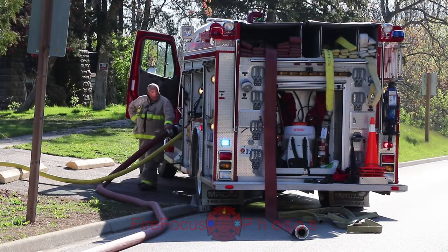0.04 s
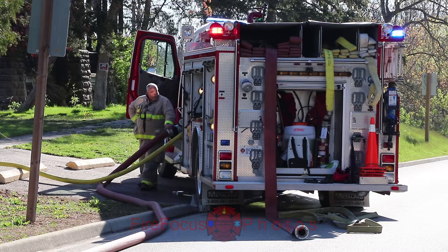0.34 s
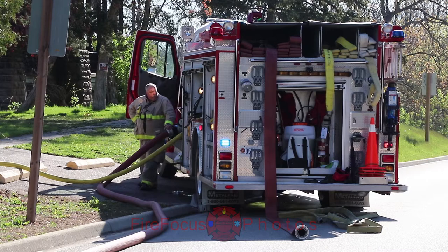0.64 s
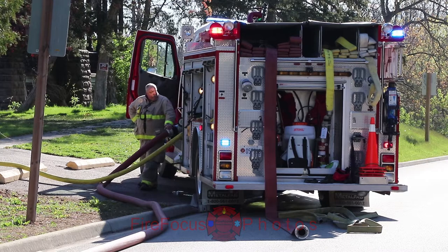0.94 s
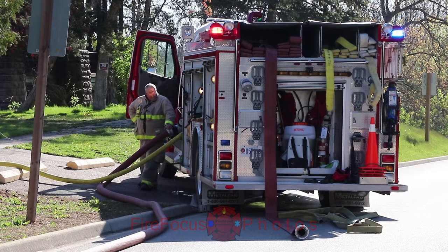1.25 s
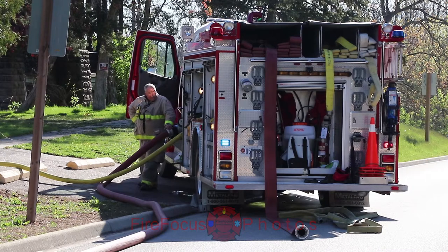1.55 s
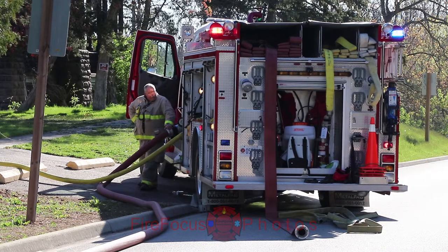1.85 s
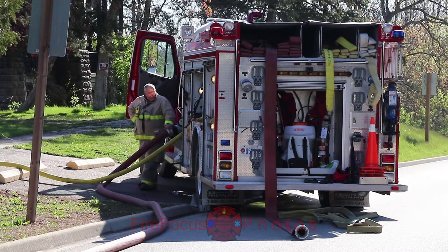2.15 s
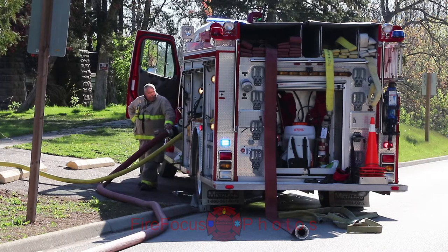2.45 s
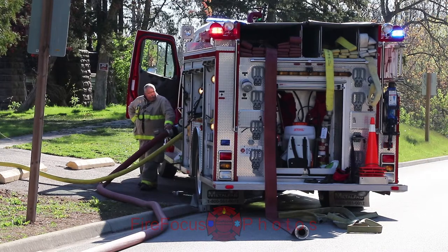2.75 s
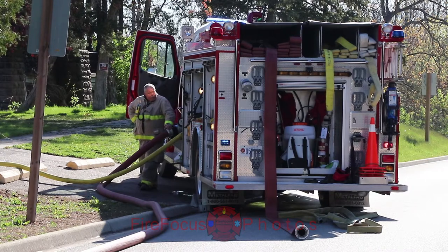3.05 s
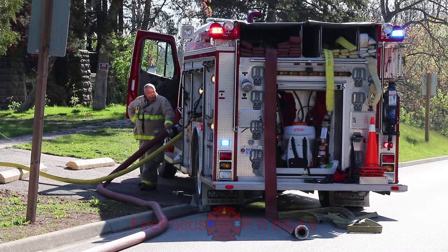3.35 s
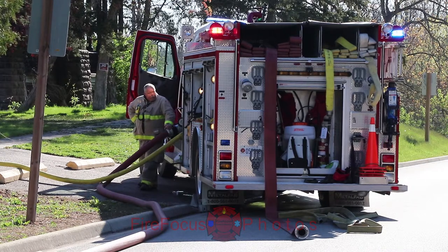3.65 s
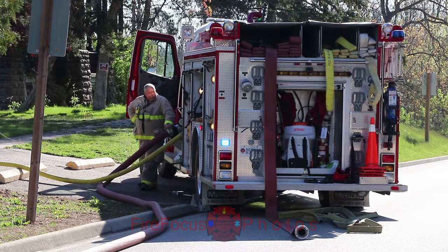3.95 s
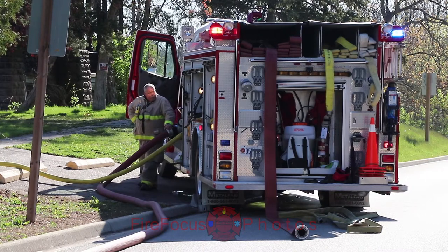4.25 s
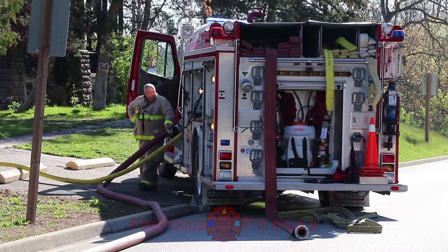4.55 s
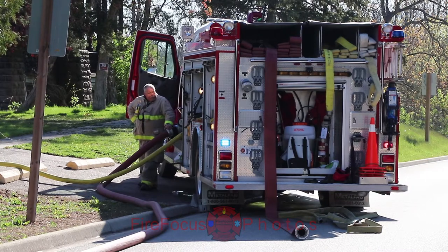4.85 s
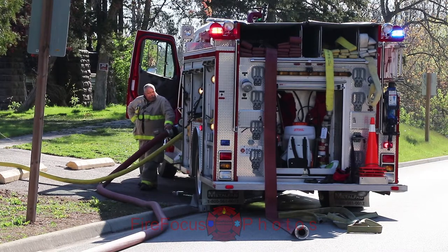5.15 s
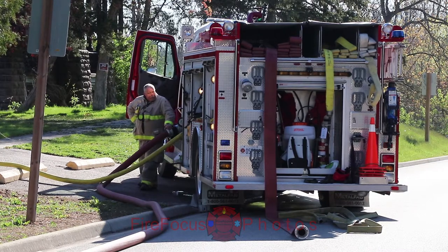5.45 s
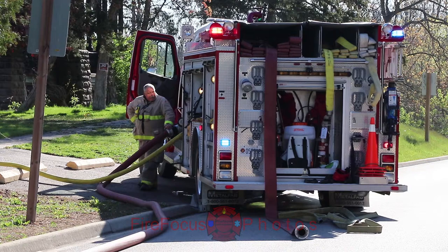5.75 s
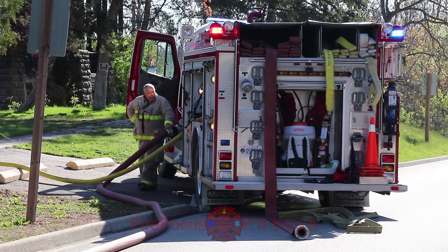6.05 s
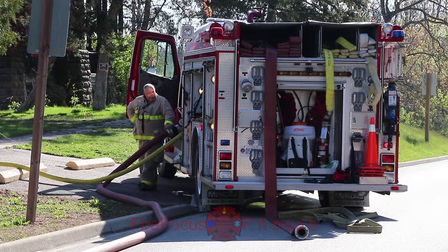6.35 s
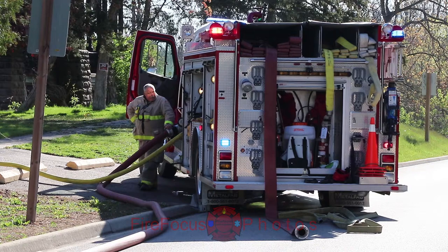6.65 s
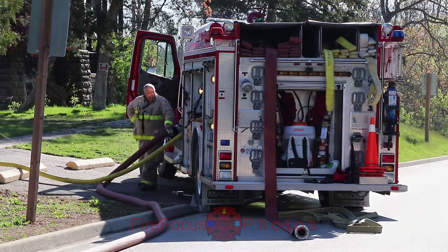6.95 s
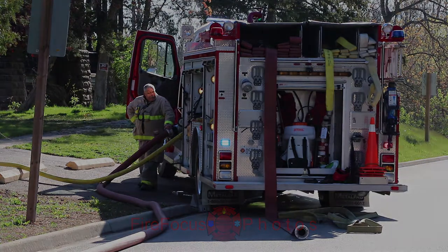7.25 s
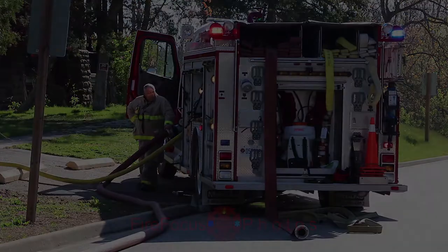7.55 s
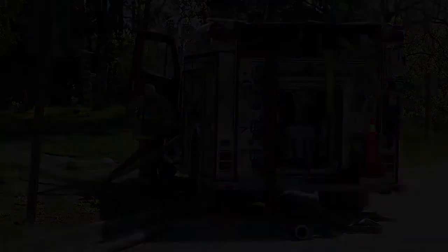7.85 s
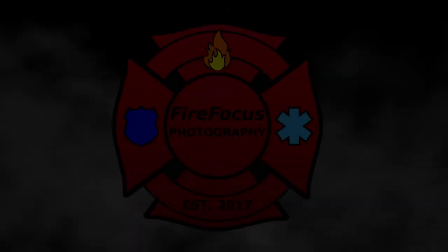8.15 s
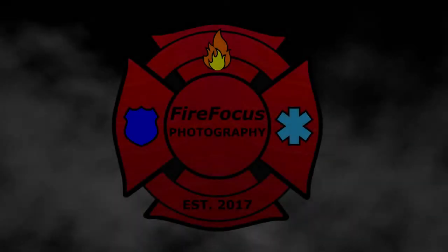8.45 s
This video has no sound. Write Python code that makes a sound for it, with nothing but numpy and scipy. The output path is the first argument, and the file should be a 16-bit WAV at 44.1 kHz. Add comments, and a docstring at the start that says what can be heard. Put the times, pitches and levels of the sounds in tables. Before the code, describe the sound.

A parked fire engine idles with a steady diesel drone, gear whine and rushing pump, while small birds chirp faintly.

```python
"""Fire engine idling, pump engaged

A six-cylinder diesel drones and clatters at the roadside, a 41-tooth gear whines on top, and the fan
and pump lay down a rushing bed. The crank speed sags around the first second and pulls the tones down
with it. A gust buffets the microphone, small birds chirp in the trees, and the sound fades out."""
import sys
import numpy as np
from scipy import signal
from scipy.fft import rfft, irfft, next_fast_len
from scipy.io import wavfile

SR = 44100
rng = np.random.default_rng(int(sys.argv[2]) if len(sys.argv) > 2 else 0)


def wav_out(sig):
    """Save sig, one row per channel (or a flat mono array), as 16-bit PCM at SR to the path in sys.argv[1]."""
    wavfile.write(sys.argv[1], SR, np.round(np.clip(np.atleast_2d(sig).T, -1, 1) * 32767).astype(np.int16))


N = 375291
TIME = np.arange(N) / SR

# long falling whistles deep in the trees: peak_s, top_hz, drop_hz, level_db
FAR_WHISTLES = [(6.635, 5600, 1100, -69.5), (7.06, 6300, 650, -74), (7.34, 5100, 600, -70)]
# short chirps of a nearby bird: peak_s, top_hz, drop_hz, level_db
NEAR_CHIRPS = [(0.950, 4130, 450, -54.5), (0.955, 4620, 330, -58.5), (1.163, 5020, 750, -59.5),
               (1.465, 4420, 1105, -54.5), (1.710, 4280, 1104, -56), (3.07, 4100, 600, -60),
               (5.325, 5000, 1800, -63), (6.05, 4900, 1800, -60.5), (6.315, 4350, 1104, -55)]
# the gust's strongest eddies thumping the microphone: peak_s, level_db, top_hz
WIND_THUMPS = [(0.817, -27.5, 170), (0.94, -25.5, 260), (1.128, -25, 140)]
# tone colour of the cooling fan and the water in the pump: frequency_hz, gain_db
RUSH_EQ = [(20, -17.5), (38, 1), (80, 5.5), (240, 3), (400, -3.5), (700, -3.5), (900, -8.5), (1250, -7),
           (2000, -12), (2750, -22.5), (3900, -30), (5000, -35), (6500, -46.5), (10000, -52.5)]
# ringing of the pump casing and pipework: pitch_hz, width_hz, level_db
CASING_RINGS = [(584, 15, -55), (1020, 120, -65), (2395, 140, -57), (3007, 70, -64.5), (4366, 87, -66)]
# crankshaft speed: time_s, speed_rpm
CRANK_SPEED = [(0.0, 933.6), (0.55, 932.5), (1.03, 903.4), (1.5, 892.3), (2.1, 888.2), (2.4, 888.2),
               (2.7, 893.8), (3.0, 894.0), (3.3, 890.8), (3.6, 891.3), (3.9, 888.0), (4.43, 893.8),
               (5.11, 890.9), (5.69, 894.6), (6.36, 894.0), (6.6, 891.0), (6.9, 893.0), (7.36, 890.0)]
# combustion knock of each cylinder, in firing order: accent_db
KNOCK_ACCENTS = [7, -3, 7, 6.5, 1, -2.5]
# tone colour of the block and valve gear: frequency_hz, gain_db
CLATTER_EQ = [(30, -14.5), (70, 3.5), (130, 3.5), (260, 7), (380, -2), (520, -6), (630, 1.5), (880, -8.5),
              (1080, 1), (1500, -11), (2400, -17.5), (2750, -18.5), (4350, -22.5), (4750, -38), (8000, -62)]
# exhaust and block tones: cycles_per_turn (played to the nearest half), low_idle_db, high_idle_db
ENGINE_TONES = [(3, -41.5, -39), (4.5, -40.5, -43.5), (6, -44.5, -42.5), (7.5, -50.5, -52),
                (9, -40.5, -49.5), (10.5, -54, -64.5), (12, -50.5, -51.5), (15, -52.5, -48),
                (19.5, -61.5, -56.5), (30, -58.5, -58.5), (39.25, -63.5, -61.5), (63.3, -67, -53),
                (66.05, -54.5, -51.5), (70.5, -61.5, -58.5), (88.1, -75, -53.5), (94.8, -68.5, -55),
                (201, -69.5, -70), (492, -87, -98)]
# hum of belt-driven parts: cycles_per_turn, low_idle_db, high_idle_db
BELT_TONES = [(5.12, -54, -55.5), (5.46, -51, -49.5), (6.92, -60, -44), (8.08, -50, -43),
              (8.71, -50.5, -59.5), (13.67, -57, -67), (13.83, -54, -43), (18.21, -50.5, -53)]
# gear harmonics 1 to 6, each with a dead speed where it cancels against its reflection:
# low_idle_db, high_idle_db, dead_rpm (above low idle), dip_db
GEAR_HARMONICS = [(-46.5, -42, 31.5, 3.5), (-46.5, -50, 22.5, 7), (-48.5, -55, 4, 14),
                  (-58.5, -60, -1.5, 9.5), (-53.5, -55.5, -2.5, 7), (-56, -56.5, 2.5, 6.5)]

GUST_PEAK_S, GUST_ATTACK_S, GUST_RELEASE_S = 1.06, 0.11, .36
GUST_DB, GUST_TOP_HZ, WIND_LIMIT_HZ, THUMP_SPREAD_S = -28.5, 135, 700, .017
CLATTER_DB, RUSH_DB, HISS_DB = -40.5, -36.5, -69
LOW_IDLE_RPM, HIGH_IDLE_RPM = 892, 933
KNOCK_DECAY = .35  # share of the firing interval
RATTLE_BED, RATTLE_LOW_HZ = 1.5, 300  # the bed is relative to a 0 dB knock
GEAR_TEETH, DIP_HALF_WIDTH_HZ = 41, 5.4
PANEL_HZ, PANEL_HALF_WIDTH_HZ, PANEL_LIFT_DB = 3708, 22, 5.0
FADE_START_S, FADE_END_S, CUTOFF_HZ = 6.94, 7.962, 15750


def from_db(db):
    """Decibels to gain."""
    return 10 ** (np.asarray(db) / 20)


def rms_one(x):
    """Scale to unit rms."""
    return x / np.sqrt(np.mean(x ** 2) + 1e-20)


def drift(rate):
    """Smooth random wobble of unit rms; rate in Hz sets how fast it moves."""
    r = np.exp(-80 * np.pi * rate / SR)
    slow = signal.lfilter([1], [1, -2 * r, r * r], rng.standard_normal(N // 40 + 2002))[2000:]
    return np.interp(np.arange(N) / 40, np.arange(len(slow)), rms_one(slow))


def tone(cycles):
    """Sine of unit rms."""
    return np.sqrt(2) * np.sin(2 * np.pi * cycles)


def gentle_filter(x, hz, kind):
    """Second-order low, high or band pass."""
    return signal.sosfilt(signal.butter(2, hz, kind, fs=SR, output="sos"), x)


def colour(x, eq):
    """Shape a signal with an EQ curve; unit rms."""
    hz, db = np.transpose(eq)
    size = next_fast_len(N)
    bins_hz = np.maximum(np.arange(size // 2 + 1) * SR / size, 1)
    gain = from_db(np.interp(np.log(bins_hz), np.log(hz), db))
    return rms_one(irfft(rfft(x, size) * gain, size)[:N])


def resonate(x, hz, width):
    """Ring one resonance; unit rms."""
    r = np.exp(-np.pi * width / SR)
    return rms_one(signal.lfilter([1, 0, -1], [1, -2 * r * np.cos(2 * np.pi * hz / SR), r * r], x))


def birds(calls, rise_s, fall_s, rough, scatter_s, scatter_db):
    """Arched whistles, up quickly and down slowly, smeared by scattering among the trees."""
    out = np.zeros(N)
    quaver = rough * drift(150)
    for peak_s, top_hz, drop_hz, db in calls:
        away = np.minimum(np.maximum((peak_s - TIME) / rise_s, (TIME - peak_s) / fall_s), 1)
        hz = top_hz - drop_hz * away ** 1.4
        out += from_db(db) * (1 - away ** 2) * tone(np.cumsum(hz) / SR + quaver)
    trees = rng.standard_normal(SR // 2) * np.exp(-TIME[:SR // 2] / scatter_s)
    tail = signal.fftconvolve(out, trees / np.linalg.norm(trees))[:N]
    return out + from_db(scatter_db) * tail


def wind(low_hz, lumpy_db):
    """One gust swells and dies away on the microphone, its eddies landing as hard thumps."""
    def rumble(top_hz):
        return rms_one(gentle_filter(rng.standard_normal(N), [low_hz, top_hz], "band"))
    since_s = TIME - GUST_PEAK_S
    gust = np.exp(-np.maximum(-since_s / GUST_ATTACK_S, since_s / GUST_RELEASE_S))
    out = from_db(GUST_DB + lumpy_db * drift(17)) * gust * rumble(GUST_TOP_HZ)
    for peak_s, db, top_hz in WIND_THUMPS:
        swell = np.exp(-.5 * ((TIME - peak_s) / THUMP_SPREAD_S) ** 2)
        eddy = swell * rumble(top_hz)
        out += from_db(db) * eddy * np.linalg.norm(swell) / np.linalg.norm(eddy)
    return gentle_filter(out, WIND_LIMIT_HZ, "low")


def fan_and_pump(surge_db):
    """A bed of turbulent air and water that surges slightly and rings the casing."""
    out = from_db(RUSH_DB) * colour(rng.standard_normal(N), RUSH_EQ)
    for hz, width, db in CASING_RINGS:
        ring = resonate(rng.standard_normal(N), hz, 2 * width)
        out += from_db(db) * resonate(ring, hz, 2 * width)  # a second pass tightens the ring
    return out * from_db(surge_db * drift(7.4))


def diesel_clatter(turns, repeat_share):
    """Each firing punches up a steady rattle, part of which loops with every two-turn engine cycle."""
    cycle = (turns / 2) % 1
    cylinder, since_firing = np.divmod(cycle * len(KNOCK_ACCENTS), 1)
    knock = from_db(KNOCK_ACCENTS)[cylinder.astype(int)] * np.exp(-since_firing / KNOCK_DECAY)
    contacts = rng.standard_normal(int(2 * N / turns[-1]))
    loop = rms_one(np.interp(cycle, np.linspace(0, 1, len(contacts)), contacts))
    loop = gentle_filter(loop, RATTLE_LOW_HZ, "high")  # the looping part of the rattle stays above the bass
    rattle = np.sqrt(repeat_share) * loop + np.sqrt(1 - repeat_share) * rng.standard_normal(N)
    return from_db(CLATTER_DB) * colour(rattle * (RATTLE_BED + knock), CLATTER_EQ)


def diesel_drone(throttle, turns, waver_db, belt_slip):
    """The body of the engine: firing tones locked to the crank, plus the looser hum of belt drives."""
    out = np.zeros(N)
    for tones, slip in ((ENGINE_TONES, 0), (BELT_TONES, belt_slip)):
        for per_turn, low_db, high_db in tones:
            if not slip:
                per_turn = np.round(2 * per_turn) / 2  # a four-stroke cycle takes two turns
            db = low_db + (high_db - low_db) * throttle + waver_db * drift(3.4)
            out += from_db(db) * tone(per_turn * turns + rng.random() + slip * drift(0.92))
    return out


def gear_whine(rpm, throttle, turns, waver_db, runout, jitter, throb_db):
    """Meshing teeth sing; the gear runs slightly out of true, so pitch and level swing once a turn."""
    mesh = GEAR_TEETH * turns + runout * np.sin(2 * np.pi * turns) + jitter * drift(5.5)
    out = np.zeros(N)
    for k, (low_db, high_db, dead_rpm, dip_db) in enumerate(GEAR_HARMONICS, 1):
        hz = k * GEAR_TEETH * rpm / 60
        dead_hz = k * GEAR_TEETH * (LOW_IDLE_RPM + dead_rpm) / 60
        db = low_db + (high_db - low_db) * throttle
        db -= dip_db / (1 + ((hz - dead_hz) / DIP_HALF_WIDTH_HZ) ** 2)
        # a panel rings as the top harmonic slides through its pitch
        db += PANEL_LIFT_DB / (1 + ((hz - PANEL_HZ) / PANEL_HALF_WIDTH_HZ) ** 2)
        # uneven tooth contact shakes the high harmonics most
        flutter_db = np.sqrt(k) * (waver_db * drift(26) + throb_db * tone(turns + rng.random()))
        out += from_db(db) * rms_one(from_db(flutter_db)) * tone(k * mesh + rng.random())
    return out


def scene():
    """Mono mix: one crank drives drone, whine and clatter over the pump, wind, birds and faint hiss."""
    rpm = np.interp(TIME, *np.transpose(CRANK_SPEED))
    turns = np.cumsum(rpm) / 60 / SR
    throttle = (rpm - LOW_IDLE_RPM) / (HIGH_IDLE_RPM - LOW_IDLE_RPM)
    truck = diesel_drone(throttle, turns, waver_db=1.0, belt_slip=0.11)
    truck += fan_and_pump(surge_db=0.41)
    truck += gear_whine(rpm, throttle, turns, waver_db=0.91, runout=0.018, jitter=0.014, throb_db=0.74)
    truck += diesel_clatter(turns, repeat_share=0.62)
    hiss = from_db(HISS_DB) * rng.standard_normal(N)
    near = birds(NEAR_CHIRPS, rise_s=.032, fall_s=.047, rough=.12, scatter_s=.045, scatter_db=-7.5)
    far = birds(FAR_WHISTLES, rise_s=.02, fall_s=.16, rough=.16, scatter_s=.05, scatter_db=-6)
    gust = wind(low_hz=35.2, lumpy_db=2)
    return (truck + gust + near + far + hiss)[None]


def record(dry):
    """Roll off the sub rumble, fade out in a straight line and cut the very top."""
    dry = gentle_filter(dry, 20, "high")
    fade = np.clip((FADE_END_S - TIME) / (FADE_END_S - FADE_START_S), 0, 1)
    top_cut = signal.ellip(12, .1, 90, CUTOFF_HZ, fs=SR, output="sos")
    return signal.sosfilt(top_cut, dry * fade)


dry = scene()
out = record(dry)
wav_out(out)
```